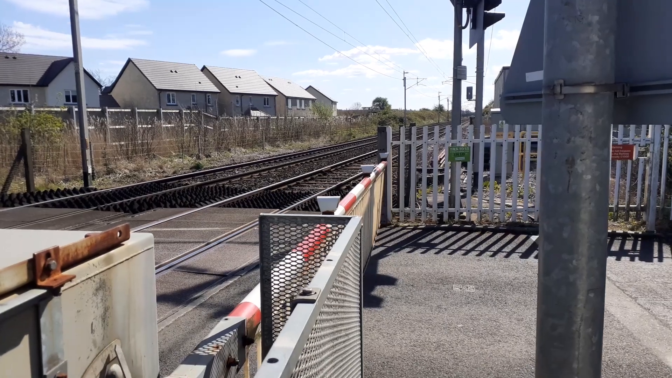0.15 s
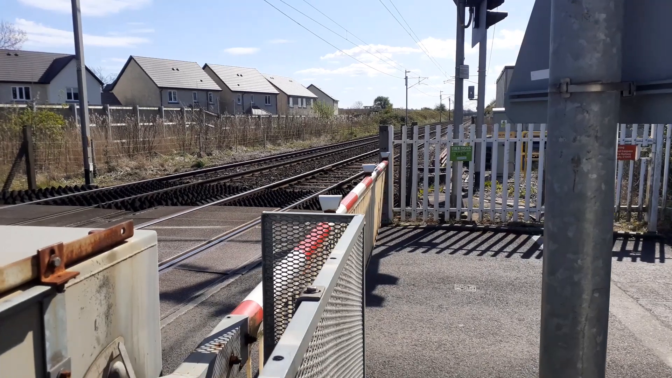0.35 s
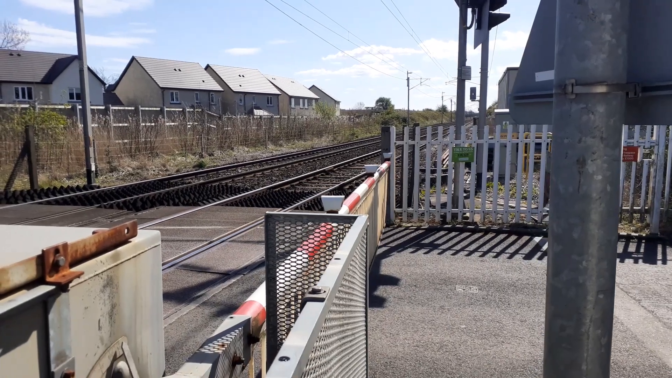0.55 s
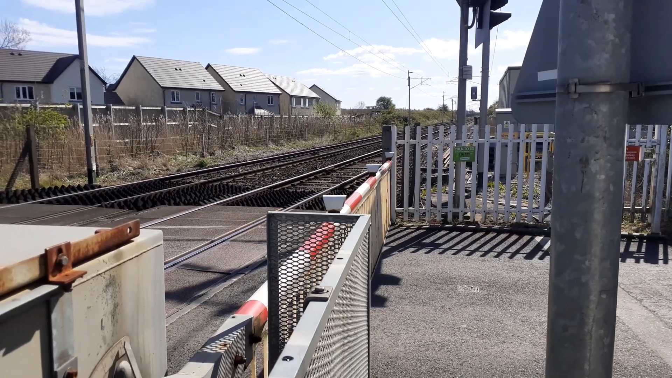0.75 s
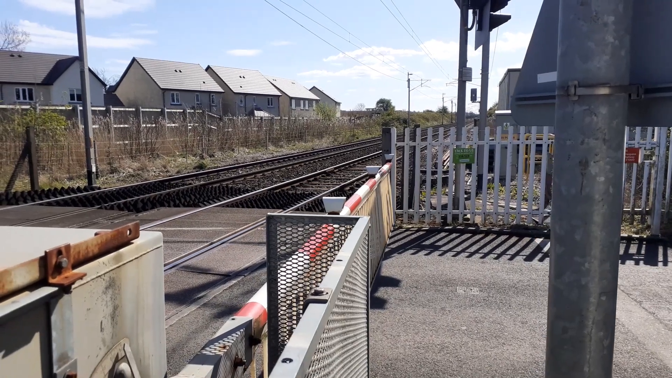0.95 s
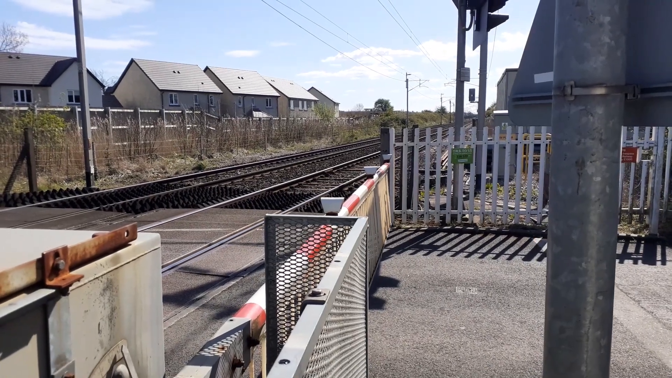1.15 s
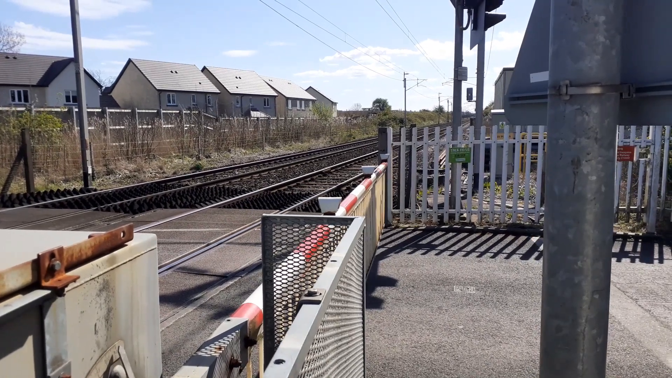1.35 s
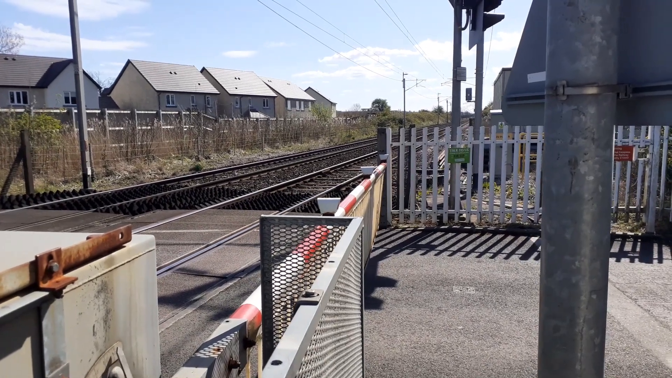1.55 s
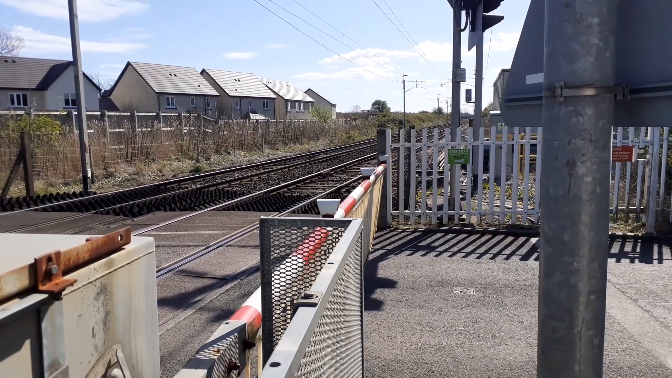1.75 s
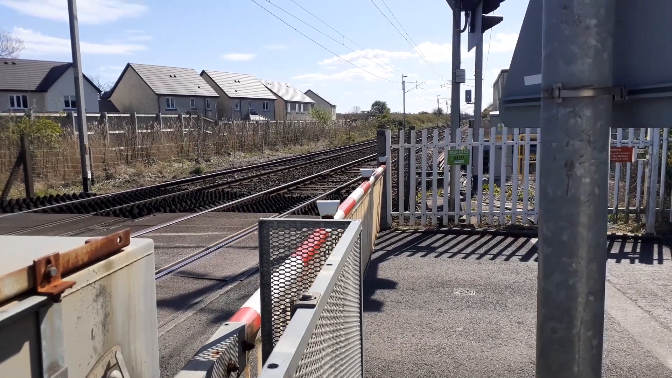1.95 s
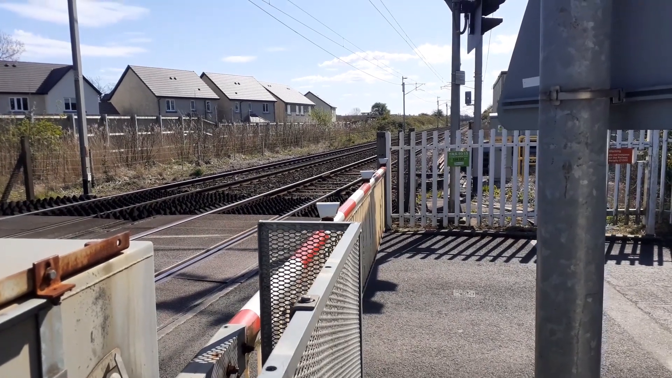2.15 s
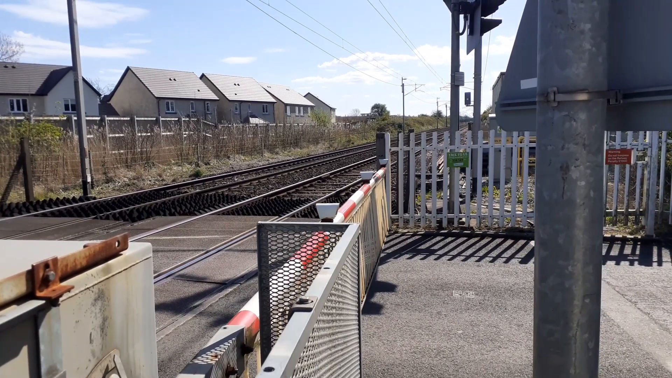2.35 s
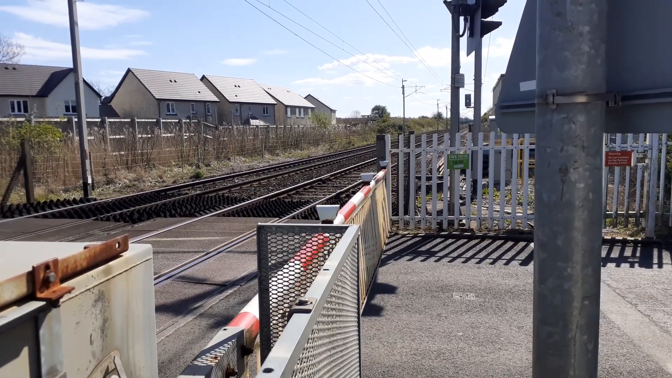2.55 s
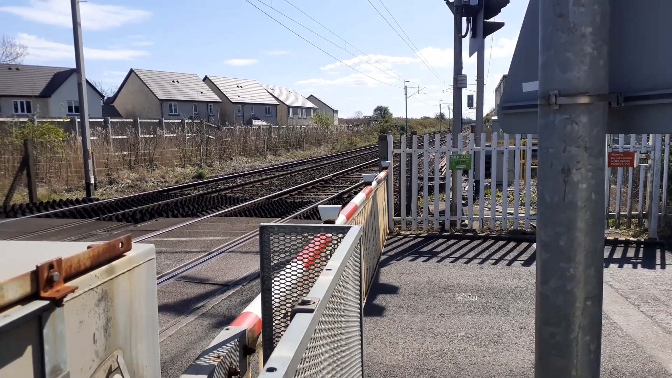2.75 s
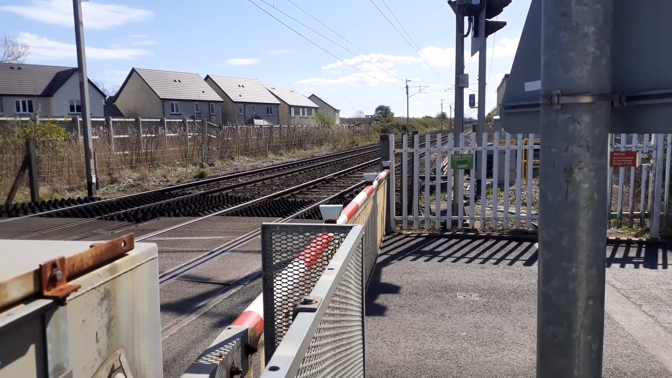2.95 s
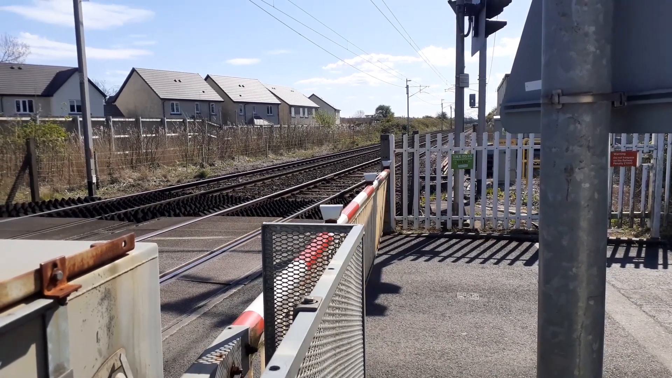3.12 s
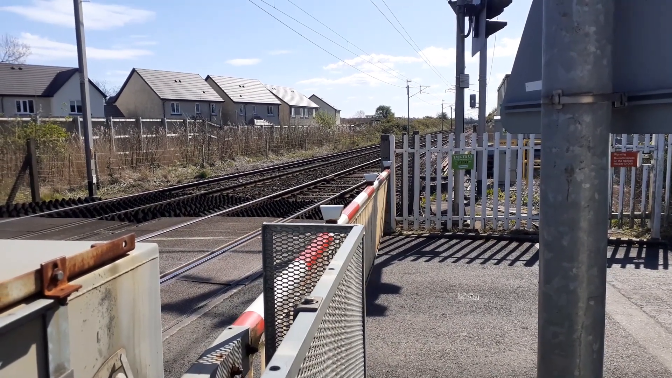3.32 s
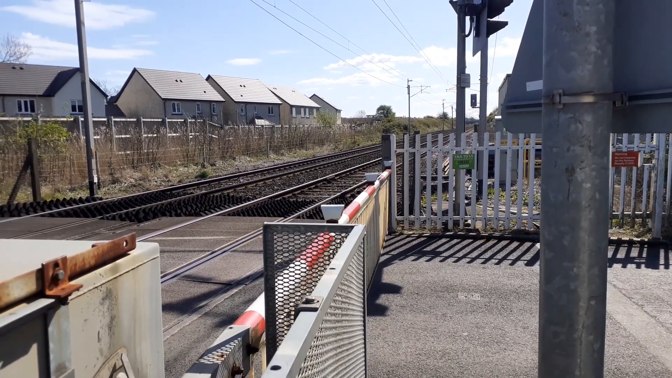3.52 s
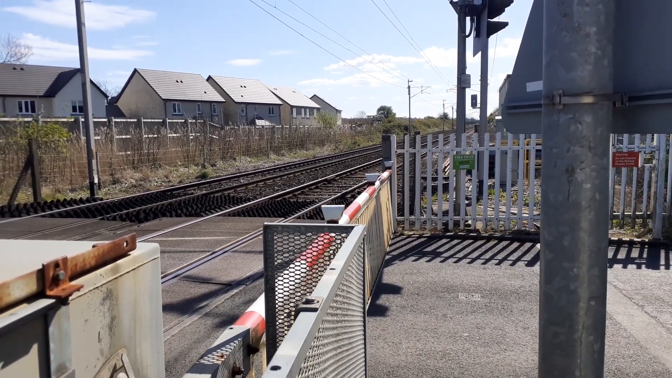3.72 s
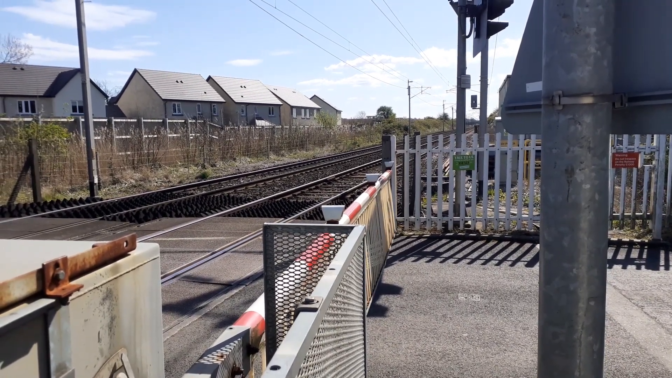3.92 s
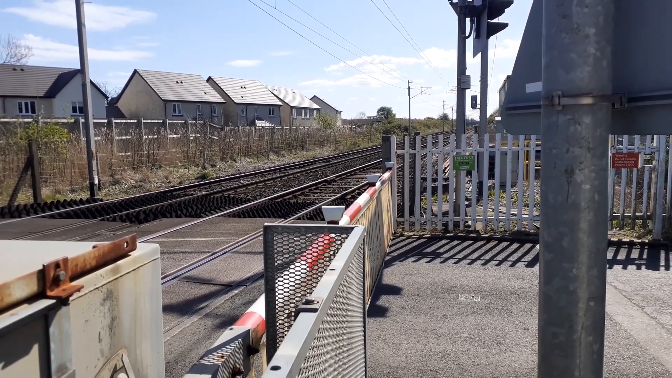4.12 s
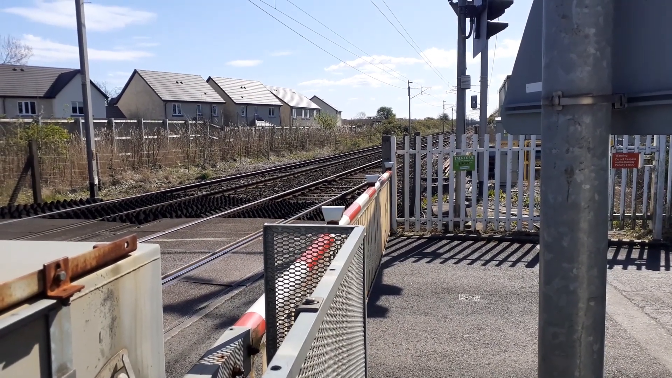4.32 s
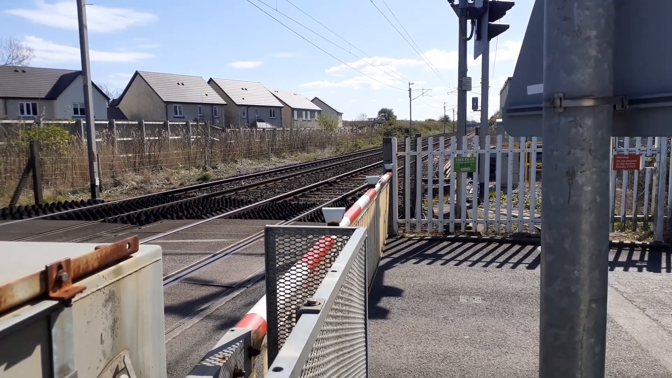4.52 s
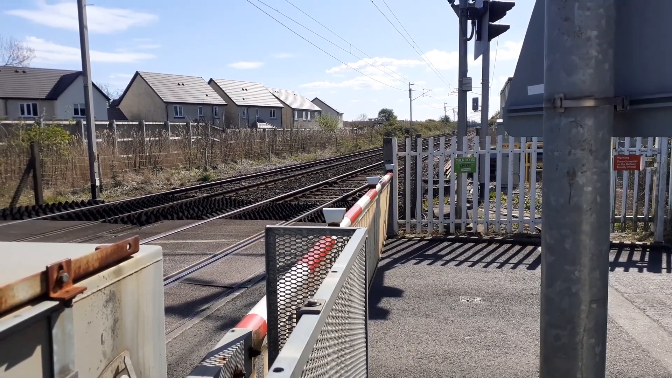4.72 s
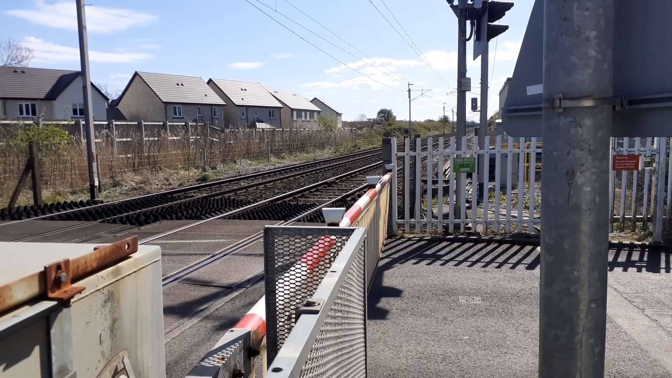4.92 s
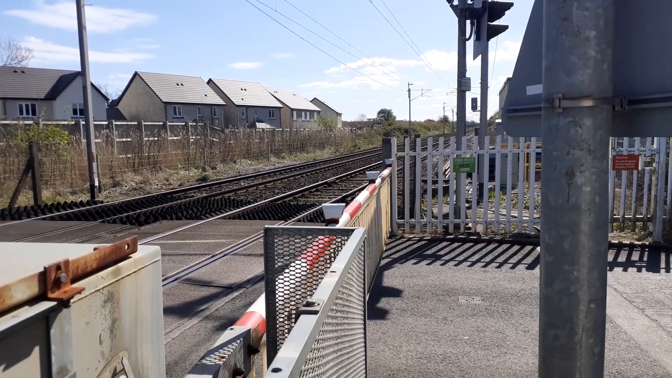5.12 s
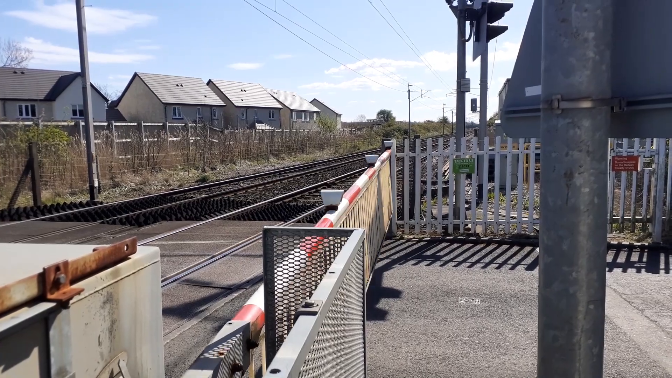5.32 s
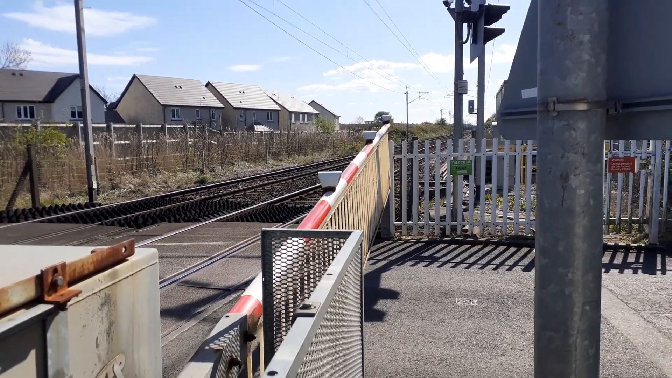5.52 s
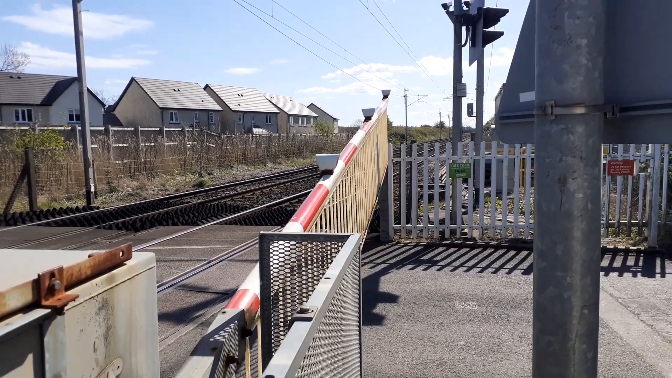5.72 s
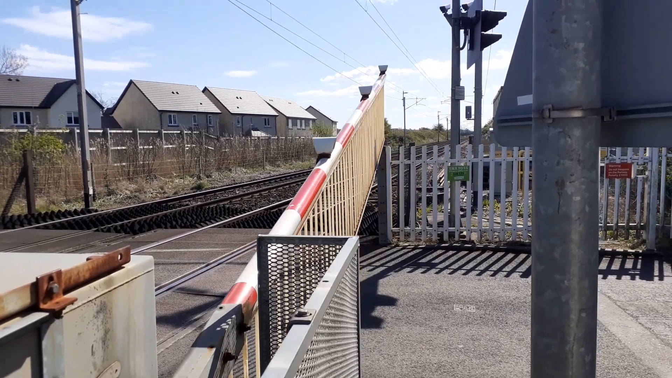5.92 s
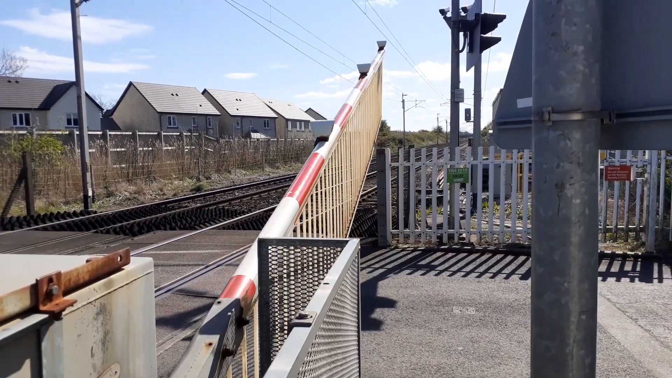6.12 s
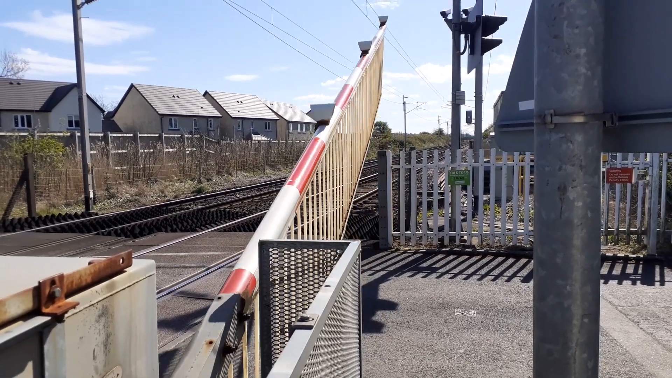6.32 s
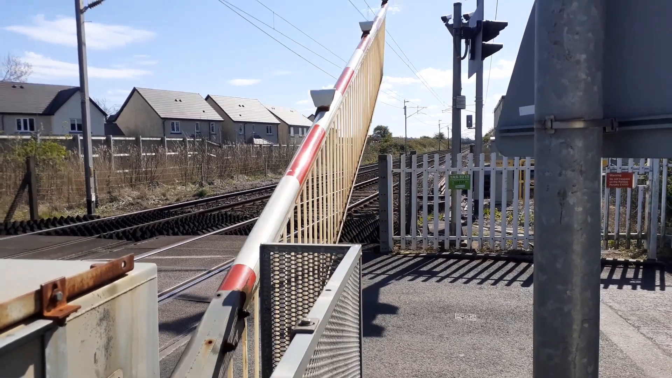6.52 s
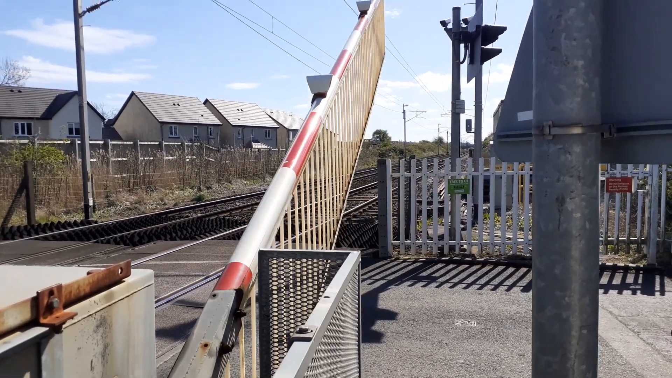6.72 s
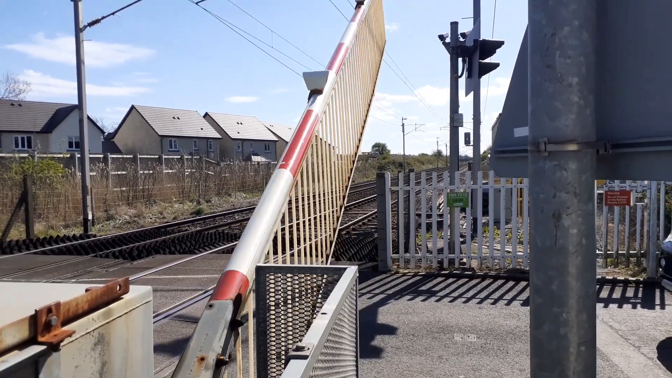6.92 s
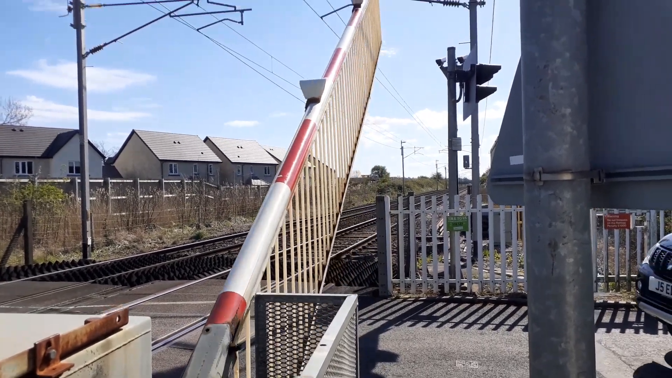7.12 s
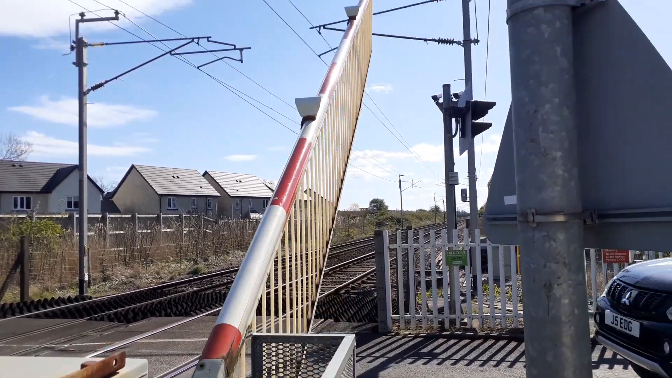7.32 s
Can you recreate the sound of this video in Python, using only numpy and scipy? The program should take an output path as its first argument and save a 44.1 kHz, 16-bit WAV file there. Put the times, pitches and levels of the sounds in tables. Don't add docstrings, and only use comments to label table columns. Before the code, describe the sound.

A close stereo microphone, unprotected from wind, hears fading train rumble and a clattering diesel idle across an open road crossing. One faint bird cheep passes. Then a nearby electric pump motor in a metal cabinet starts abruptly, dips in pitch under load, climbs back and holds a resonant whine. Metal bars clank, linkage scrapes, gusts pop on the left, and the car accelerates at the end.

```python
import sys
import numpy as np
from scipy import signal
from scipy.fft import rfft, irfft, next_fast_len
from scipy.io import wavfile
from scipy.ndimage import uniform_filter1d, map_coordinates

SR = 44100
rng = np.random.default_rng(int(sys.argv[2]) if len(sys.argv) > 2 else 0)


def invert_db(level):
    return 10 ** (np.asarray(level, dtype=float) / 20)


def master(y):
    cut = np.clip(np.atleast_2d(y).T, -1, 1)
    pcm = np.round(cut * 32767)
    wavfile.write(sys.argv[1], SR, pcm.astype(np.int16))


N = 328986
T = np.arange(N) / SR
PORTS = np.array([[.5], [-.5]])

# (t/s, effort/dB)
CAR_EFFORT = [(0, -1), (.6, -2.5), (1.5, -4), (2.3, -0.5), (3.2, 1), (4.6, 0.5), (4.85, 2.5), (5.25, 3),
              (5.6, 0), (6.2, -2.5), (6.6, 2.5), (7.0, 5.5), (7.46, 5.5)]
# (f/Hz, left minus right/dB)
LEAN = [(60, 0), (110, -1), (200, 1.5), (380, -2.5), (700, 2.5), (1290, 3.5), (2380, -1.5), (4400, -1),
        (8120, -5), (15000, 7)]
# (f/Hz, phase/radians)
LAG = [(40, -0.5), (430, 1), (650, -2.5), (900, -1), (1100, -3.5), (1800, -5), (2100, -4), (3200, 0),
       (4400, 1.5), (6800, 6), (11000, 12)]
# (t/s, peak level/dB)
LEFT_EDDIES = [(2.5261, -24.5), (2.8466, -24), (3.9146, -17), (3.92, -13), (4.3337, -12.5), (4.3395, -9),
               (4.5289, -19), (4.5458, -22), (4.5546, -10), (4.5814, -19), (4.7017, -13), (5.4019, -13),
               (5.951, -6), (5.9701, -10), (5.9956, -7), (6.0397, -12), (6.0612, -9), (6.1398, -16.5),
               (6.5732, -20), (6.7301, -12.5), (7.1212, -10), (7.3065, -5.5), (7.3403, -6.5), (7.3757, -6),
               (7.4419, -17), (7.4575, -16.5)]
RIGHT_EDDIES = [(0.3445, -11.5), (0.353, -10), (0.3611, -3), (0.371, -11), (0.3792, -26), (0.3912, -14.5),
                (0.4003, -2), (0.4085, -4), (0.4145, -2), (0.4275, -5), (0.436, -14), (0.565, -8),
                (0.5774, -8.5), (0.5894, -10), (0.5959, -6), (0.724, -17), (0.9643, -18.5), (0.9733, -12.5),
                (0.9847, -17.5), (1.2865, -10.5), (1.296, -11.5)]


def unit(x):
    return x / np.sqrt(np.mean(x ** 2) + 1e-20)


def along(points, hz):
    f, v = np.transpose(points)
    return np.interp(np.log(hz + 1), np.log(f + 1), v)


def curves(rows):
    s, *cols = np.transpose(rows)
    return [np.interp(T, s, c) for c in cols]


def wobble(rate, near=slice(None)):
    knots = rng.standard_normal(int(N * rate / SR) + 4)
    return map_coordinates(knots, [T[near] * rate])


def filtered(x, response):
    m = next_fast_len(N + SR // 4)
    return irfft(rfft(x, m) * response(np.fft.rfftfreq(m, 1 / SR)), m)[..., :N]


def coloured(spectrum):
    return lambda hz: invert_db(along(spectrum, hz))


def fuzzy(tones):
    return lambda f: sum(1 / (1 + ((f - hz) / width) ** 2) for hz, width in tones)


def turns(hz):
    return 2 * np.pi * np.cumsum(hz) / SR


def around(s, reach):
    return slice(max(round((s - reach) * SR), 0), round((s + reach) * SR))


def bell(s, length):
    out, near = np.zeros(N), around(s, 3 * length)
    out[near] = np.exp(-.5 * ((T[near] - s) / (length / 2)) ** 2)
    return out


def ringing(rows, rise):
    out = np.zeros(N)
    for s, hz, db, t60 in rows:
        near = slice(int(s * SR) + 1, round((s + t60) * SR))
        age = T[near] - s
        swell = 1 - np.exp(-age / rise)
        out[near] += invert_db(db - 60 * age / t60) * swell * np.sin(2 * np.pi * hz * age)
    return out


def rush(gain):
    # (f/Hz, likeness of left and right from 0 to 1)
    alike = [(40, 0.7), (130, 0.54), (340, 0.89), (700, 0.26), (1100, 0.57), (1800, 0.36), (2700, 0.2),
             (4500, .35), (6500, 0.16), (10000, .08)]

    def split(hz):
        spread = np.arccos(np.clip(along(alike, hz), -1, 1)) / 2
        return gain(hz) * [np.cos(spread), np.sin(spread)]

    def lean_and_lag(hz):
        return invert_db(along(LEAN, hz) * PORTS) * np.exp(-1j * along(LAG, hz) * PORTS)

    mid, side = filtered(rng.standard_normal((2, N)), split)
    return unit(filtered(np.array([mid + side, mid - side]), lean_and_lag))


def train():
    # (f/Hz, level/dB per Hz)
    roar_spectrum = [(290, -39), (500, -13), (654, -16), (720, -5), (839, -2), (978, -6.5), (1090, -2.5),
                     (1230, -3), (1340, -13.5), (1490, -7.5), (1540, -5), (1610, -3.5), (1850, -6.5),
                     (2010, -19.5), (2300, -17), (2990, -30.5), (5060, -120)]
    # (f/Hz, level under the roar/dB, loudest at t/s, length/s)
    singing = [(817, -9.5, 1.4, 2.2), (831, -9.5, 3.43, 1.4), (905, -9.5, 2.9, 1.56), (1008, -19, 2.2, 3),
               (1117, -7, 1.9, 3.8), (1215, -8.5, 0.83, 1.8), (1213, -7, 4, 2.5), (1249, -2, 0.064, 0.29),
               (1240, -2, 1.32, 0.41), (1248, -14, 3.15, 0.53), (1537, -13, 1.0, 2.5),
               (1597, -3, 0.69, 1.2), (1578, -11, 2.4, 2.5), (1660, -11.5, 4.14, 0.45), (1806, -16, 2.8, 4)]
    # (f/Hz, level/dB per Hz)
    road_spectrum = [(290, -33), (500, -5), (663, -24.5), (687, -3.5), (937, 1), (963, 0), (1920, -7.5),
                     (2600, -28), (3380, -45.5), (5720, -120)]
    # (f/Hz, level/dB per Hz)
    drone_spectrum = [(15, -63), (28, -32.5), (40, -8.5), (54, -0.5), (73, -10), (86, -7.5), (114, -9),
                      (130, -6.5), (179, -13), (194, -17.5), (271, -6.5), (390, -4.5), (467, -14.5),
                      (700, -14), (910, -47), (1540, -120)]
    roar = invert_db(1.0 + 0.26 * wobble(11.0)) * rush(coloured(roar_spectrum))
    for hz, db, s, length in singing:
        near = around(s, 1.5 * length)
        sway_hz, sway_db = 3.5 * wobble(25, near), 3 * wobble(14, near)
        lag = along(LAG, hz) + 1.2 * wobble(8, near)
        tone = np.sin(turns(hz + sway_hz) - lag * PORTS)
        level = invert_db(db + 2.5 + along(LEAN, hz) * PORTS + sway_db)
        roar[:, near] += level * bell(s, length)[near] * tone
    effort_db, = curves(CAR_EFFORT)
    tail_db = 2 * np.exp(-T / 0.51)
    rails = np.clip((5.4 - T) / 0.5, 0, 1)
    roar_db = -34.5 - 0.97 * T + tail_db
    road_db = -42.5 + 0.42 * effort_db
    drone_db = -38 + 2.3 * tail_db + 0.33 * effort_db + wobble(5.1)
    roar = np.sqrt(rails) * invert_db(roar_db) * roar
    road = np.sqrt(1 - rails) * invert_db(road_db) * rush(coloured(road_spectrum))
    return roar + road + invert_db(drone_db) * rush(coloured(drone_spectrum))


def car():
    # (f/Hz, level/dB per Hz)
    clatter_spectrum = [(710, -36.5), (1300, -20), (1900, -7.5), (2700, -7.5), (3440, -9.5), (5000, -14),
                        (5700, -16), (6600, -16.5), (7840, -21.5), (8600, -23.5), (9500, -33),
                        (11000, -42.5), (16000, -120)]
    # (f/Hz, level/dB per Hz)
    hiss_spectrum = [(6000, -60), (9000, -14), (10200, -7.5), (11200, -2), (12500, 0), (14200, 0),
                     (15700, -2), (16000, -60)]
    # (t/s, firings a second/Hz, hum level/dB)
    firing = [
        (0, 21.6, -41),
        (5, 21.6, -42),
        (6.5, 21.6, -45),
        (6.7, 23, -43),
        (6.9, 26.5, -41),
        (7.15, 28.2, -38),
        (7.46, 28, -38),
    ]
    cylinders = [0.5, -0.58, 0.96, -0.59]
    # (t/s, f/Hz, level/dB)
    turbo = [
        (6.65, 7300, -92),
        (6.8, 8700, -74),
        (6.87, 9500, -78),
        (7, 10900, -76),
        (7.08, 12000, -73),
        (7.15, 13000, -73),
        (7.21, 13700, -77),
        (7.46, 14500, -86),
    ]
    effort_db, = curves(CAR_EFFORT)
    rate, hum_db = curves(firing)
    count = np.cumsum(rate) / SR - 0.0258 * rate[0]
    beat = np.cos(2 * np.pi * count)
    size = np.array(cylinders)[np.round(count).astype(int) % len(cylinders)] + 1.6 * wobble(27)
    idle = np.clip(np.maximum((5.15 - T) / .5, np.minimum(T - 6.4, .6)), .2, 1)
    clatter_db = idle * (2 + 0.3 * size) * beat + 0.9 * wobble(8)
    clatter = invert_db(clatter_db) * rush(coloured(clatter_spectrum))
    injector = fuzzy([(6500, 220), (3450, 150)])
    tick = invert_db(size - 7.5) * idle * ((1 + beat) / 2) ** 3 * rush(lambda f: injector(f) ** 2)
    hum = invert_db(hum_db - 1.5 + 3 * wobble(4)) * np.sin(10 * np.pi * count)
    hum += invert_db(-47 + 3 * wobble(5) + 8 * bell(1.4, .5)) * np.sin(6 * np.pi * count)
    whistle_hz, whistle_db = curves(turbo)
    whistle = invert_db(whistle_db + 5 + 3 * wobble(30)) * np.sin(turns(whistle_hz + 100 * wobble(150)))
    train_air = invert_db(-63) * np.exp(-(T / 1.1) ** 2)
    air = np.hypot(invert_db(-69 + 0.8 * effort_db), train_air)
    hiss = air * invert_db(3.0 + .8 * beat * idle + .7 * wobble(10)) * rush(coloured(hiss_spectrum))
    return invert_db(-47.5 + effort_db) * (clatter + tick) + hiss + hum + whistle


def bird():
    # (t/s, level/dB, length/s, f/Hz)
    cheep = (2.158, -50, .035, 4500)
    s, db, length, hz = cheep
    bend_hz = 2500 * np.clip(T - s, -.1, .1) + 120 * wobble(200)
    return invert_db(db) * bell(s, length) * np.sin(turns(hz + bend_hz))


def ducking(loud):
    keep = np.exp(-1 / (0.43 * SR))
    power = signal.lfilter([1 - keep], [1, -keep], np.mean(loud ** 2, 0))
    return (1 + power / invert_db(2 * -16.5)) ** (-0.85 / 2)


def wind():
    # (f/Hz, level/dB per Hz)
    thud_spectrum = [(12, -120), (27, -54.5), (50, -14), (100, 6), (170, -5), (260, -14), (500, -51.5),
                     (900, -120)]
    # (f/Hz, level/dB per Hz)
    flutter_spectrum = [(50, -120), (120, -26.5), (220, -3.5), (320, 2.5), (480, -12.5), (750, -18.5),
                        (1300, -59), (2500, -120)]
    # (t/s, thud level/dB, length/s)
    left_puffs = [(0.626, -16, 0.017), (0.851, -25, 0.023), (2.535, -24, 0.039), (2.666, -24.5, 0.052),
                  (2.75, -26, 0.037), (2.855, -21, 0.054), (3.922, -23.5, 0.067), (4.338, -36, 0.035),
                  (4.54, -17, 0.064), (4.685, -23.5, 0.16), (4.776, -23.5, 0.033), (5.404, -22, 0.041),
                  (5.536, -21, 0.019), (5.596, -21, 0.031), (5.807, -23, 0.18), (5.966, -16, 0.05),
                  (6.057, -22.5, 0.027), (6.12, -19.5, 0.046), (6.242, -26.5, 0.19), (6.459, -25, 0.11),
                  (6.572, -18.5, 0.039), (6.685, -18.5, 0.031), (6.728, -21, 0.071), (6.932, -23.5, 0.081),
                  (7.001, -24, 0.022), (7.063, -17.5, 0.021), (7.122, -18, 0.036), (7.303, -23, 0.095),
                  (7.366, -37, 0.032), (7.44, -19, 0.067)]
    right_puffs = [(0.223, -26.5, 0.051), (0.302, -23, 0.021), (0.357, -16, 0.036), (0.457, -27, 0.022),
                   (0.407, -18, 0.078), (0.526, -31, 0.081), (0.573, -16, 0.073), (0.73, -20, 0.06),
                   (0.95, -20, 0.11), (1.291, -14.5, 0.024), (5.18, -34, 0.24)]
    puffs = [sum(invert_db(db) * bell(s, length) for s, db, length in port) for port in (left_puffs, right_puffs)]
    thud = invert_db(-3.5) * np.array(puffs)
    swirl = np.array([sum(invert_db(db) * bell(s, .024) for s, db in port) for port in (LEFT_EDDIES, RIGHT_EDDIES)])
    flutter = invert_db(-19 + 3.0) * thud + invert_db(-23.5) * swirl
    lumps = invert_db(3.3 * np.array([wobble(60), wobble(59.45)]))
    low = unit(filtered(rng.standard_normal((2, N)), coloured(thud_spectrum)))
    low /= np.sqrt(np.abs(uniform_filter1d(low ** 2, size=1200)) + 0.082)
    high = unit(lumps * filtered(rng.standard_normal((2, N)), coloured(flutter_spectrum)))
    return thud * low + flutter * high


def pops():
    out = np.zeros((2, N + SR))
    t = np.arange(-441, 2205) / SR
    ring = 0.29 * (t > 0) * invert_db(-60 * t / 0.073) * np.sin(2 * np.pi * 110 * t)
    for port, eddies in enumerate((LEFT_EDDIES, RIGHT_EDDIES)):
        for s, db in eddies:
            burst_hz = 290 + 5.5 * db
            u = (t * burst_hz * 2.88) ** 2
            pulse = (np.where(t > 0, 1.6, .9) * u - 1) * np.exp(-u)
            start = round(s * SR) - 441
            out[port, start:start + len(t)] += invert_db(db) * (pulse + ring)
    return filtered(out[:, :N], lambda hz: 1 / (1 + (55 / (hz + 1)) ** 4))


def slap():
    # (t/s, f/Hz, level/dB, time to fall 60 dB/s)
    flick = [
        (4.5262, 330, 3, .016),
        (4.5262, 620, -6, .01),
    ]
    return ringing(flick, rise=0.001) * np.array([[1], [0]])


def linkage():
    # (t/s, level/dB, length/s, centre f/Hz)
    scrapes = [(.62, -68, .04, 13000), (.77, -67, .05, 13000), (4.92, -69, .22, 12500),
               (4.97, -57, .25, 5200), (4.975, -32, .02, 280), (5.02, -32, .07, 210), (5.08, -41, .12, 450),
               (5.05, -63, .025, 12500), (5.073, -47, .012, 4900), (5.079, -58, .02, 14000),
               (5.108, -44, .012, 1800), (5.123, -44, .018, 4200), (5.01, -57, .04, 6500),
               (5.075, -61, .015, 11500), (5.122, -46, .01, 2200), (5.125, -61, .06, 12500),
               (5.07, -55, .01, 8000), (5.107, -50, .007, 4800), (5.108, -56, .008, 9500),
               (5.107, -57, .008, 14500), (5.11, -53, .1, 5500), (5.07, -45, .17, 850),
               (4.86, -59, .14, 6800), (5.4, -61, .08, 6000), (5.45, -51, .35, 800), (6.5, -58, .06, 2500),
               (5.1, -67, .1, 9000), (5.14, -48, .05, 2200), (5.38, -69, .1, 12500), (5.95, -54, .03, 2600),
               (5.975, -55, .02, 4800), (5.965, -52, .012, 1900), (5.992, -46, .014, 1200),
               (6.02, -52, .12, 2200), (5.997, -52, .014, 4300), (6.008, -49, .012, 4400),
               (6.006, -52, .016, 2800), (6.0, -59, .025, 6300), (6.046, -55, .018, 4700),
               (6.066, -61, .012, 14500), (6.068, -52, .018, 5000), (6.082, -55, .014, 2600),
               (6.095, -57, .012, 4200), (6.11, -52, .016, 2500), (6.108, -62, .016, 7100)]
    out = np.zeros((2, N))
    span = SR // 2
    f = np.fft.rfftfreq(span, 1 / SR)
    for s, db, length, hz in scrapes:
        start = round((s - .25) * SR)
        grains = invert_db(2.5 * rng.standard_normal(span // 50).repeat(50))
        noise = rng.standard_normal((2, span)) * grains
        spread = np.clip((900 / hz) ** 1.4, .05, .35)
        gain = np.exp(-(np.log(f + 1) - np.log(hz)) ** 2 / spread)
        band = unit(irfft(rfft(noise) * gain, span))
        out[:, start:start + span] += invert_db(db + 5) * bell(s, length)[start:start + span] * band
    return out


def skirt_bars():
    # (t/s, f/Hz, level/dB, time to fall 60 dB/s)
    clank = [(5.977, 720, -21, .014), (6.058, 650, -27, .014), (6.058, 480, -27, .04),
             (5.979, 1000, -33, .04), (6.06, 1050, -40, .05), (6.011, 2150, -42, .03),
             (6.027, 2050, -43, .03), (5.445, 920, -41, .3), (5.61, 920, -43, .2),
             (5.139, 11900, -56, .025), (6.551, 520, -24, .035), (6.551, 720, -26, .03),
             (6.56, 620, -29, .03), (5.07, 5200, -51, .1), (5.115, 2900, -48, .15), (5.975, 1100, -47, .25),
             (5.993, 4230, -50, .2), (6.002, 2050, -49, .3), (6.04, 5000, -55, .15), (6.105, 2900, -53, .2)]
    return ringing(clank, rise=0.0014) * invert_db(np.array([[1.5], [-1.5]]))


def gears():
    # (from t/s, to t/s, f/Hz, level/dB, unsteadiness/Hz)
    whistles = [(5.22, 5.58, 1120, -60, 3), (6.08, 6.47, 1147, -59, 2), (6.53, 6.8, 1140, -61, 2),
                (5.52, 5.67, 2960, -58, 45), (5.67, 5.76, 2960, -57, 40), (5.75, 5.97, 2980, -61, 35),
                (6.45, 6.85, 2920, -68, 35), (5.95, 6.4, 4280, -72, 10), (5.6, 6.0, 5615, -76, 12),
                (6.0, 6.45, 2960, -68, 30), (6.05, 6.7, 2730, -74, 10), (6.8, 7.1, 2980, -63, 50),
                (7.02, 7.6, 3100, -59.5, 30), (6.1, 6.3, 4011, -71, 10), (6.48, 6.85, 3985, -65, 12),
                (6.8, 7.08, 4020, -65, 12), (7.08, 7.6, 4020, -63, 25), (6.8, 7.6, 1900, -64, 20),
                (7.15, 7.45, 5600, -71, 160), (6.7, 7.1, 6200, -71, 60)]
    out = np.zeros((2, N))
    for start, end, hz, db, sway in whistles:
        near = slice(round(start * SR), round(end * SR))
        on = np.clip(np.minimum(T[near] - start, end - T[near]) / 0.05, 0, 1)
        tone = np.sin(turns(hz + sway * wobble(60, near)) + np.array([[0], [1.2]]))
        out[:, near] += invert_db(db + 6.5 + 2.5 * wobble(18, near)) * on * tone
    return out


def cabinet(hz):
    # (f/Hz, width/Hz, level/dB)
    panels = [(229, 19, -19), (295.3, 18, -8.5), (334.5, 14, -0.5), (360.64, 13.9, 0), (420.5, 67, -7.5),
              (480.5, 33, -14)]
    return sum(invert_db(db) / (1 + 2j * (hz - centre) / width) for centre, width, db in panels)


def motor():
    # (t/s, shaft turns a second/Hz, pump effort/dB)
    start_up = [(4.96, 83.8, -38.5), (4.995, 83.4, -20), (5.02, 78.9, -4), (5.05, 73.05, -8),
                (5.078, 66.97, -15.5), (5.12, 62.64, -12.5), (5.16, 60.37, -13.5), (5.245, 59.4, -13),
                (5.28, 59.43, -17.5), (5.33, 59.36, -17), (5.405, 62.05, -11), (5.435, 64.3, -11),
                (5.53, 67, -11), (5.575, 69.1, -17), (5.612, 70.45, -13.5), (5.65, 71.5, -11)]
    # (t/s, shaft turns a second/Hz, pump effort/dB)
    lifting = [(5.78, 72.96, -11), (5.93, 72.74, -10.5), (6.07, 71.9, -12.5), (6.28, 71.5, -14),
               (6.36, 71.82, -11.5), (6.6, 71.5, -13.5), (6.7, 70.9, -13.5), (6.75, 70.5, -17),
               (6.87, 70.23, -16), (6.95, 70.4, -14.5), (7.46, 70, -14.5)]
    # (multiple of the shaft, level under the whine/dB, rise/dB per Hz below easy speed)
    leaks = [(3, -15.5, 0.71), (4, -18.5, 1.35), (6, -32, 1.4), (8, -41.5, 1.5)]
    # (multiple of the shaft, level/dB)
    faint = [(7, -55.5), (9, -53.5), (10, -52), (11, -61.5), (13, -57.5), (15, -58.5), (20, -62.5)]
    # (t/s, f/Hz, level/dB, time to fall 60 dB/s)
    rings = [
        (4.4, 160, -36, 0.35),
        (5.05, 654, -29, 0.38),
        (5.05, 372, -10.5, 0.4),
        (5.09, 331, -18.5, .35),
        (5.17, 297, -17, 0.23),
    ]
    shaft, effort_db = curves(start_up + lifting)
    shaft = uniform_filter1d(shaft, size=701) + 0.12 * wobble(5)
    running = np.clip((T - start_up[0][0]) / 0.0063, 0, 1)
    angle = turns(shaft + .25 * wobble(30))

    def order(k, db):
        wave = cabinet(k * shaft) * np.exp(1j * (k * angle + k * k))
        return invert_db(effort_db + 3 + db) * np.imag(wave)

    out = order(5, (.5 + 2.5 * bell(5.22, .25)) * wobble(35))
    easy_hz = 72.84
    strain = np.maximum(easy_hz - shaft, 0.23 * (shaft - easy_hz))
    for k, db, gain in leaks:
        out += order(round(k), db + gain * strain + 2 * wobble(8))
    for k, db in faint:
        out += invert_db(db - .7 * strain + 2.5 * wobble(9)) * np.sin(round(k) * angle)
    out += invert_db(-36.5 + 1.5 + 2.1 * wobble(9)) * bell(5.17, 0.23) * np.sin(angle)
    out += ringing(rings, rise=0.0031)
    whine = invert_db(effort_db) * np.abs(cabinet(5 * shaft))
    growl = filtered(rng.standard_normal(N), lambda f: np.exp(-((f - 320) / 70) ** 2))
    out += (whine * invert_db(-24.5) + invert_db(-25.0) * bell(5.2, 0.62)) * unit(growl)
    shifted = np.clip((T - 6.73) / .04 + .5, 0, 1)
    left = (1 - shifted) * np.roll(out, -6) + shifted * invert_db(-1) * out
    left += whine * invert_db(-29.5) * unit(np.roll(growl, 9000))
    return running * np.array([invert_db(-2.5) * left, out])


def scene():
    whine = motor()
    street = ducking(whine) * (train() + car()) + bird()
    gusts = wind() + pops() + slap()
    barrier = whine + gears() + linkage() + skirt_bars()
    return street + gusts + barrier


def top_cut(x):
    return signal.sosfilt(signal.butter(12, 15790, fs=SR, output="sos"), x)


def record(dry):
    rounded = dry / (1 + np.abs(dry / .95) ** 6) ** (1 / 6)
    return top_cut(rounded)


dry = scene()
out = record(dry)
master(out)
```